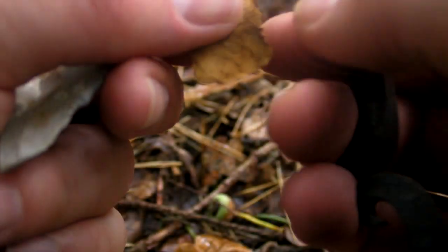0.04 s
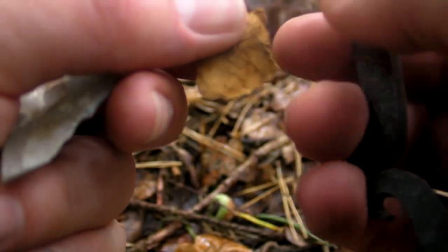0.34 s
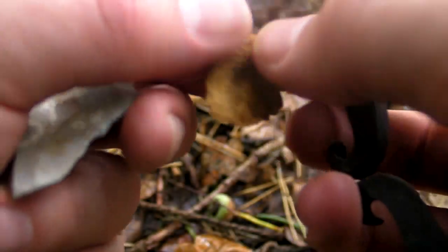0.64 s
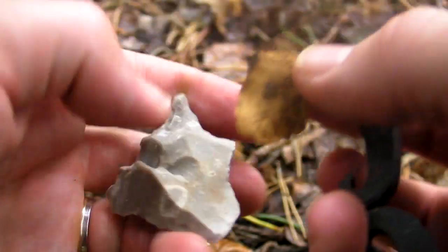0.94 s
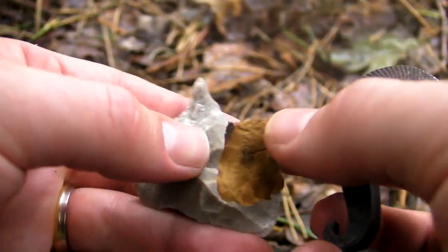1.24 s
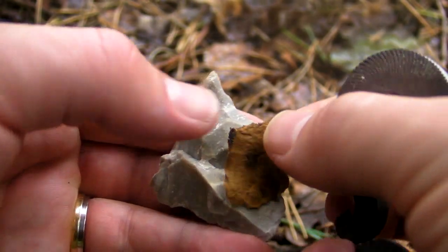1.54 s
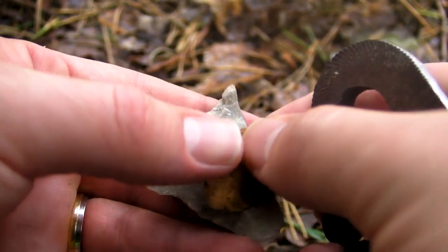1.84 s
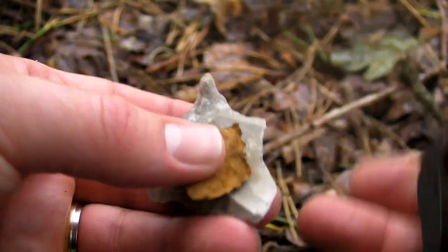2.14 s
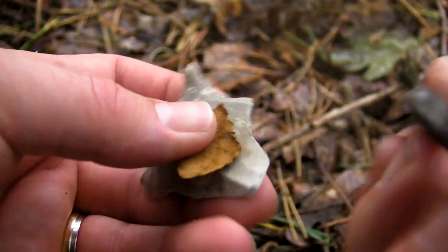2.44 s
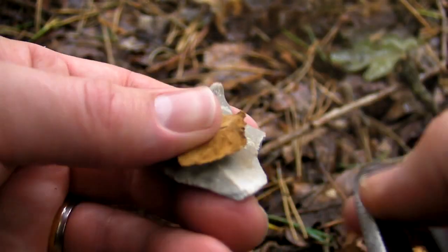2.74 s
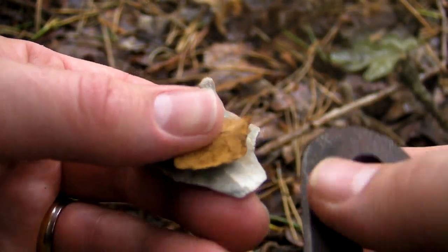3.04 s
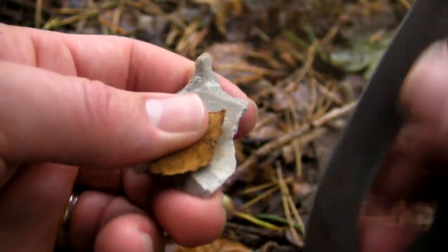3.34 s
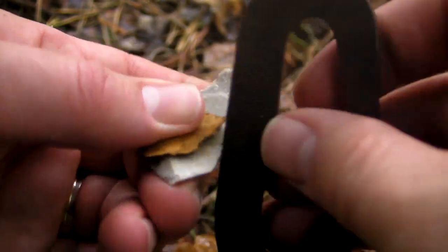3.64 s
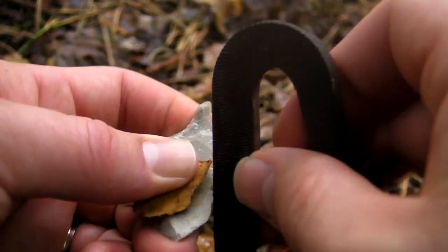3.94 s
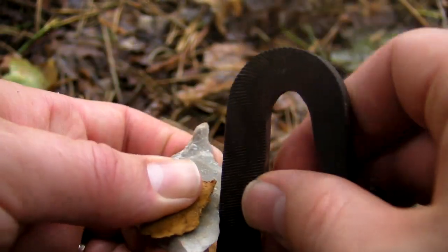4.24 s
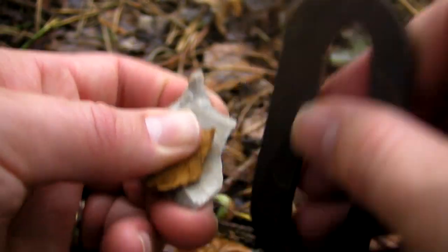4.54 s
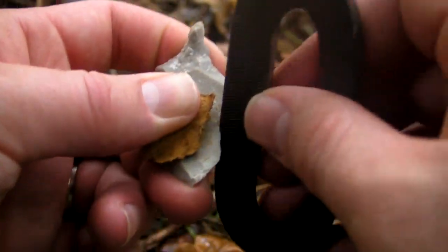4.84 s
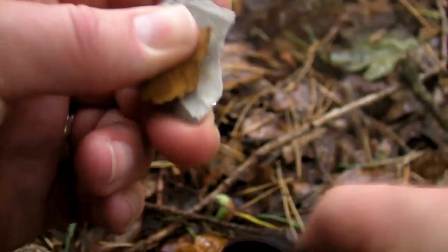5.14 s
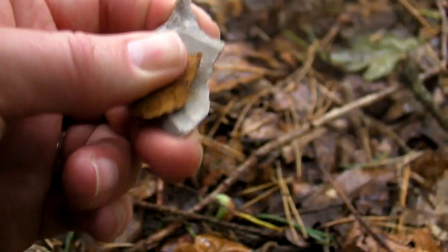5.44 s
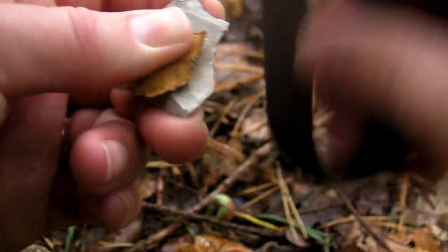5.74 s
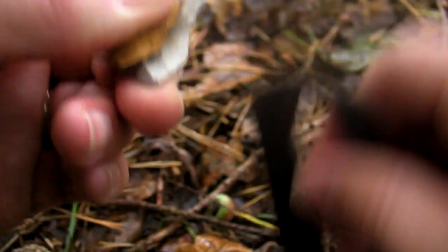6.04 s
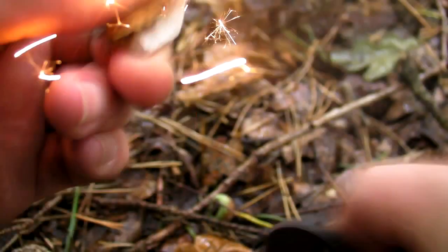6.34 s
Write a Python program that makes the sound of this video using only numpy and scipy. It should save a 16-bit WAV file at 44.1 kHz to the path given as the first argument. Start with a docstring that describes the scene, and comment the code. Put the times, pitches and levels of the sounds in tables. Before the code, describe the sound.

Light handling ticks and taps of steel on flint, then four sharp, hard strikes with a brief metallic ring, close up outdoors.

```python
"""A steel striker hits a flint four times, close by and hard enough to clip the microphones.
Each blow chips the stone, scrapes down its edge and sets the steel ringing briefly.
Before that, fingers settle dry tinder on the flint and the steel tries the edge with light
rubs and taps. On the quiet forest floor, a faint low hum comes and goes under the hiss of the air."""
import sys
import numpy as np
from scipy import signal
from scipy.fft import rfft, irfft, next_fast_len
from scipy.io import wavfile
from scipy.ndimage import uniform_filter1d, map_coordinates

SR = 44100
rng = np.random.default_rng(int(sys.argv[2]) if len(sys.argv) > 2 else 0)


def master_out(mix):
    """Clip the mix to full scale and print it as 16-bit PCM to the path in sys.argv[1]."""
    frames = np.transpose(np.atleast_2d(mix))
    ceiling = np.clip(frames, -1, 1)
    pcm = np.round(ceiling * 32767).astype(np.int16)
    wavfile.write(sys.argv[1], SR, pcm)


N = 291501
T = np.arange(2 ** 13) / SR  # time within one event, s


def amp(db):
    """Decibels to gain."""
    return 10 ** (np.asarray(db) / 20)


def unit(x):
    """Scale to rms 1."""
    return x / np.sqrt(np.mean(x ** 2) + 1e-20)


def along(points, hz):
    """Read (f/Hz, value) points on a log axis."""
    f, values = np.transpose(points)
    return np.interp(np.log(hz + 1), np.log(f + 1), values)


def curve(points):
    """Read (t/s, value) points at every sample."""
    return np.interp(np.arange(N) / SR, *np.transpose(points))


def wobble(rate_hz):
    """Smooth random curve, rate_hz knots a second."""
    knots = rng.standard_normal(int(N * rate_hz / SR) + 4)
    return map_coordinates(knots, [np.arange(N) * rate_hz / SR])


def add(track, at_s, sound):
    """Mix a sound into the track."""
    part = track[:, round(at_s * SR):][:, :sound.shape[-1]]
    part += sound[..., :part.shape[1]]


def band(x, lo_hz, hi_hz):
    """Causal band-pass; attacks stay sharp."""
    sos = signal.butter(2, [lo_hz, min(hi_hz, SR / 2 - 1)], "band", fs=SR, output="sos")
    return signal.sosfilt(sos, x)


def peak(hz, skirt_db):
    """Spectrum of one broad resonance."""
    return [(hz / 8, 2 * skirt_db), (hz / 2, skirt_db), (hz * 2 ** -0.25, -4), (hz, 0),
            (hz * 2 ** 0.059, -4), (hz * 2, skirt_db), (hz * 8, 2 * skirt_db)]


def noise(spectrum, correlation, size):
    """Stereo noise, rms 1, of given colour and left-right correlation."""
    hz = np.fft.rfftfreq(size, 1 / SR)
    angle = np.arccos(np.clip(along(correlation, hz), -1, 1)) / 2
    gain = amp(along(spectrum, hz)) / np.sqrt(1 + (hz / SR) ** 4)
    white = rfft(rng.standard_normal((2, size)))
    mid, side = irfft(white * gain * [np.cos(angle), np.sin(angle)], size)
    return unit(np.array([mid + side, mid - side]))


def ring(hz, db, t60_s):
    """Damped modes; level and pitch vary with each blow."""
    strength, detune = rng.standard_normal((2, len(hz)))
    t = T[:, None]
    phase = 2 * np.pi * hz * (1 + 0.005 * detune) * t
    fade = amp(db + 1.5 * strength - 60 * t / t60_s)
    return np.sum(fade * np.sin(phase), 1)


# Close sounds: f/Hz, left-right correlation
NEAR_CORRELATION = [(200, 0.52), (2500, 0.84), (6000, 0.64), (9000, 0.45), (15000, .1)]
def burst(spectrum, t60_s):
    """Impact noise decaying from about level 1."""
    fade = amp(-60 * T / t60_s)
    return unit(noise(spectrum, NEAR_CORRELATION, len(T)) * fade) * np.sqrt(np.mean(fade ** 2))


def friction(spectrum, rough_db, slip_samples=40):
    """Surfaces catch and slip at random."""
    catches = unit(uniform_filter1d(rng.standard_normal(len(T)), size=slip_samples))
    return unit(noise(spectrum, NEAR_CORRELATION, len(T)) * amp(rough_db * catches))


def stroke(length_s, spectrum, rough_db):
    """Grainy noise that swells and fades once."""
    swell = np.sqrt(np.abs(np.sin(np.pi * np.minimum(T / length_s, 1))))
    return swell * friction(spectrum, rough_db, slip_samples=90)


# Low air noise and hiss spectra: f/Hz, level/dB
LOW_AIR_SPECTRUM = [(12, -48), (20, -15), (38, -28), (71, -1.5), (140, -4.5), (171, -5), (241, -12.5),
                    (351, -4.5), (456, 0), (503, -5.5), (546, -5), (622, -8.5), (863, -9.5), (1000, -10),
                    (1300, -20), (2200, -120)]
HISS_SPECTRUM = [(470, -11.5), (800, -8), (862, -6), (1180, -5.5), (1420, -5.5), (1920, -5), (2240, -3.5),
                 (4030, -4.5), (4460, -5), (7450, -6), (8130, -8.5), (13600, -11), (16000, -18)]
# Open air: f/Hz, left-right correlation
AIR_CORRELATION = [(60, 0.72), (130, 0.79), (300, 0.22), (640, 0.5), (1400, 0.54), (3100, 0.4),
                   (6000, 0.085), (15000, 0.16)]
# Base level of the air: t/s, level/dB
AIR_LEVEL = [(0.0, -51.5), (2.74, -51), (3.31, -52), (3.87, -48.5), (4.29, -51), (5.52, -50), (6.61, -50)]
def air():
    """Low air noise under a nearly steady hiss."""
    base_db, size = curve(AIR_LEVEL), next_fast_len(N)
    low = amp(base_db - 4.5 + 0.37 * wobble(7)) * noise(LOW_AIR_SPECTRUM, AIR_CORRELATION, size)[:, :N]
    hiss = amp(base_db + 1.26 + 0.1 * wobble(5.6)) * noise(HISS_SPECTRUM, AIR_CORRELATION, size)[:, :N]
    return low + hiss


def tinder_crackle(count, level_db, spread_db):
    """Dry tinder crackles faintly at random moments."""
    out = np.zeros((2, N))
    for when, size, pitch in rng.random((count, 3)):
        crackle = burst(peak(700 * 10 ** pitch, skirt_db=-6.5), t60_s=0.014)
        add(out, when * N / SR, amp(level_db + spread_db * size ** 3) * crackle)
    return out


# Soft swells of noise: t/s, length/s, level/dB, f/Hz
SOFT_RUSTLES = [(0.223, .05, -44, 7500), (0.637, 0.047, -46.5, 5970), (1.739, 0.062, -47.5, 9250),
                (1.977, 0.039, -45.5, 6540), (2.468, 0.14, -50.5, 4500), (4.08, 0.2, -52, 645),
                (5.202, .18, -51.5, 5400)]
def rustles():
    """Faint rustles and rubs, and a high shimmer lingering after the first strike."""
    out = np.zeros((2, N))
    for at_s, length_s, db, hz in SOFT_RUSTLES:
        add(out, at_s, amp(db) * stroke(length_s, peak(hz, skirt_db=-7.5), rough_db=1.0))
    return out


# Contacts of fingers, tinder and flint: t/s, level/dB, f/Hz, relative knock/dB
HANDLING_TICKS = [(0.524, -32, 11000, -10), (0.865, -32.5, 5890, -27), (0.939, -27, 6100, -23),
                  (1.18, -39, 756, -7), (1.293, -30, 5000, -27), (1.584, -30.5, 3770, -14),
                  (1.884, -32.5, 2180, -25), (1.988, -32, 2560, -27), (2.364, -31, 907, -21),
                  (2.401, -29.5, 6060, -12), (3.54, -31, 4450, -49), (5.706, -29, 2940, -20.5),
                  (6.173, -29, 3580, -28), (6.402, -27, 2510, -27)]
# Knock in the hand: f/Hz, level/dB
KNOCK_SPECTRUM = [(80, -5), (250, -8), (550, 6), (1200, 2), (2200, -18), (8000, -30)]
def handling():
    """Each small contact gives a pitched tick and a dull knock."""
    out = np.zeros((2, N))
    for at_s, db, hz, knock_db in HANDLING_TICKS:
        tick = amp(-5.5) * burst(peak(hz, skirt_db=-9.5), t60_s=0.021)
        knock = amp(knock_db + 5.5) * burst(KNOCK_SPECTRUM, t60_s=0.024)
        add(out, at_s + 0.001, amp(db) * (tick + knock))
    return out


# Swells of the hum: t/s, level/dB
HUM_LEVEL = [(0, -97), (2.3, -70.5), (2.75, -66), (3.22, -52.5), (3.58, -59), (3.8, -73), (4.0, -65),
             (4.3, -60.5), (4.45, -76), (4.8, -54.5), (5.15, -71), (5.8, -64), (6.25, -56.5), (6.55, -59)]
def hum():
    """A faint low tone comes and goes, wavering slightly in pitch."""
    hz = 138 + 0.97 * wobble(7.6)
    return amp(curve(HUM_LEVEL) + 1) * unit(np.sin(2 * np.pi * np.cumsum(hz) / SR))


# Steel sliding on flint: f/Hz, level/dB
SLIDE_SPECTRUM = [(200, -11), (700, -20.5), (1200, -7), (2000, -1.5), (3000, -4), (3900, -16), (5300, -11),
                  (5900, -6.5), (6600, -19), (9000, -24), (16000, -20)]
# Light touches: t/s, flint/dB, flint pitch ratio, ring/dB, grit/dB, rebound gap/s, slide/s, slide/dB
LIGHT_TAPS = [(2.404, -43.5, 1.05, -48, -49, 0.0045, 0.022, -52),
              (3.6098, -4.5, 1.11, -13, -17.5, .0024, 0.0098, -32),
              (3.648, -21, 0.72, -48, -47, 0.0057, .004, -32),
              (3.6678, -19.5, 0.87, -33, -41, 0.0036, .004, -35),
              (3.7069, -27.5, 0.68, -46, -49, .003, 0.032, -36.5),
              (3.786, -26, .86, -34, -45, .0026, .003, -33.5),
              (3.9492, -13.5, 1, -10, -14.5, .0012, .028, -28.5),
              (4.4602, -25, 1.02, -34, -21.5, 0.0056, .01, -36.5),
              (4.7779, -7.5, 1.01, -19, -20.5, 0.00134, 0.023, -34),
              (4.8875, -18, 0.78, -44, -20.5, 0.0043, 0.039, -35)]
def slides(rise_db):
    """Steel drags along the flint, ever more firmly, into each tap."""
    out = np.zeros((2, N))
    for at_s, *_, length_s, db in LIGHT_TAPS:
        closing_db = rise_db * (np.minimum(T / length_s, 1) - 1)
        rub = stroke(length_s + 0.0067, SLIDE_SPECTRUM, rough_db=3.0)
        add(out, at_s - length_s, amp(db + closing_db) * rub)
    return out


def taps(contacts, light_db):
    """Each tap chatters; the firmer it is, the faster its rebounds fade."""
    out = np.zeros((2, N))
    for at_s, flint_db, pitch, ring_db, grit_db, gap_s, *_ in LIGHT_TAPS:
        loss_db = 6 + 0.39 * (flint_db - light_db)
        for k in range(contacts):
            touch = contact(flint_db, pitch, ring_db - k * loss_db / 2, grit_db, ring_t60_s=0.039)
            add(out, at_s + k * gap_s, amp(-k * loss_db) * touch)
    return out


# Hand-held flint: f/Hz, level/dB, t60/s
FLINT_MODES = [(846, -37, 0.002), (1440, -49, 0.021), (2260, -56, 0.0063), (2590, -4.5, 0.0076),
               (3040, -8, 0.0076), (3520, -14, 0.013), (4070, -27.5, 0.01)]
def flint_click(pitch):
    """Dry click; the pitch ratio stands for contact point and grip."""
    hz, db, t60_s = np.transpose(FLINT_MODES)
    return band(ring(hz * pitch, db, t60_s), lo_hz=543, hi_hz=6200)


# Steel striker: f/Hz, level/dB
STEEL_MODES = [(5880, -1), (5980, -12), (7350, -22), (9550, -29.5), (10580, -40), (12400, -37),
               (13370, -24.5), (15480, -27)]
def steel_ring(t60_s, attack_s):
    """The striker rings; the grip damps all modes alike."""
    hz, db = np.transpose(STEEL_MODES)
    return ring(hz, db, t60_s) * (1 - np.exp(-T / attack_s))


# Grit under the steel: f/Hz, level/dB
GRIT_SPECTRUM = [(150, -27), (450, 4), (1300, -38), (2500, 11), (3400, -9), (5000, 4.5), (6800, 3.5),
                 (8500, -12), (16000, 5)]
def contact(flint_db, pitch, ring_db, grit_db, ring_t60_s):
    """Steel meets flint: click, short ring and a little grit."""
    steel = amp(ring_db) * steel_ring(ring_t60_s, attack_s=0.00085)
    grit = amp(grit_db) * band(burst(GRIT_SPECTRUM, t60_s=0.018), lo_hz=280, hi_hz=9000)
    return amp(flint_db + 2) * flint_click(pitch) + steel + grit


# Flint chipping and scrape down the edge: f/Hz, level/dB
CHIP_SPECTRUM = [(120, -31), (200, -37), (465, -14), (1450, -11.5), (2560, -3.5), (3250, -6.5), (3690, 1),
                 (5040, -2.5), (5940, -2.5), (7410, 0.5), (8120, -5.5), (10900, -9.5), (11700, -9),
                 (13600, -2), (16000, -25)]
SCRAPE_SPECTRUM = [(300, -39), (1500, -36), (2200, -4), (3600, -0.5), (5000, 0), (6800, 4), (8500, -9),
                   (10800, -3.5), (11900, -34), (13400, -3), (16000, -28)]
# Hard blows: t/s, crack/dB, crack low cut/Hz, scrape/dB, scrape/s, thud/dB, ring/dB,
# crunch/Hz, crunch/dB, bite delay/s, bite/dB
HARD_STRIKES = [(5.1267, -4.5, 303, -16, 0.015, -16, -1.5, 2770, -29, .0064, -11),
                (5.5574, -3.5, 600, -10, 0.007, -22, -2.5, 2700, -9.5, .0095, -20),
                (5.9455, -4, 1620, -9.5, 0.01, -31.5, -3.5, 3210, -13, .0048, -20),
                (6.3202, 3.5, 1010, -14, 0.014, -19.5, 0, 3830, -20, .0045, -14.5)]
def strikes():
    """The steel chips the edge, rings, jolts the hand and crunches on down the flint."""
    out = np.zeros((2, N))
    thud_spectrum = [(25, -23), (85, 6.5), (240, -30), (420, 3.5), (1000, -7.5), (3000, -25), (9000, -50)]
    for (at_s, crack_db, cut_hz, scrape_db, scrape_s, thud_db, ring_db,
         crunch_hz, crunch_db, *_) in HARD_STRIKES:
        # glancing blows have less body: higher low cut
        crack = amp(crack_db) * band(burst(CHIP_SPECTRUM, t60_s=0.015), lo_hz=cut_hz, hi_hz=18600)
        scrape = amp(scrape_db) * friction(SCRAPE_SPECTRUM, rough_db=0) * np.exp(-(T / scrape_s) ** 2)
        # each contact point has its own resonance
        crunch = amp(crunch_db) * friction(peak(crunch_hz, skirt_db=-34), rough_db=1.5)
        crunch *= amp(-60 * T / (5 * scrape_s))
        thud = amp(thud_db) * burst(thud_spectrum, t60_s=0.029)
        steel = amp(ring_db) * steel_ring(t60_s=0.015, attack_s=0.00039)
        add(out, at_s, crack + scrape + crunch + thud + steel)
    return out


def bites(click_db):
    """The flint clicks under each strike; a moment later the steel bites again."""
    out = np.zeros((2, N))
    main_hz = max(FLINT_MODES, key=lambda mode: mode[1])[0]
    for at_s, *_, crunch_hz, _, delay_s, db in HARD_STRIKES:
        pitch = crunch_hz / main_hz
        add(out, at_s, amp(click_db) * flint_click(pitch))
        bite = contact(db - 6, pitch, ring_db=db - 0.5, grit_db=db - 5, ring_t60_s=0.017)
        add(out, at_s + delay_s, bite)
    return out


def swishes(level_db, width_s):
    """A soft hiss swells and fades around each strike."""
    out = np.zeros((2, N))
    t = T - T.mean()
    swell = np.exp(-(t / width_s) ** 2 - (t / 0.03) ** 8)
    for at_s, *_ in HARD_STRIKES:
        add(out, at_s - T.mean(), amp(level_db) * swell * noise(CHIP_SPECTRUM, NEAR_CORRELATION, len(T)))
    return out


# Forest reverberation: f/Hz, t60/s
FOREST_DECAY = [(200, 0.075), (2500, 0.12), (12000, 0.093)]
def forest(x):
    """Ground and trunks scatter a short tail."""
    hz, t, bins = signal.stft(rng.standard_normal((2, SR // 2)), SR, nperseg=256)
    fade = amp(-60 * t / along(FOREST_DECAY, hz)[:, None])
    _, tail = signal.istft(bins * fade, SR, nperseg=256)
    return signal.fftconvolve(x, tail / np.linalg.norm(tail[0]), axes=1)[:, :N]


def mic_ports(x, one_radian_hz):
    """Treble reaches the two microphone ports out of step, right first."""
    size = next_fast_len(N + 4096)
    lag_rad = (np.fft.rfftfreq(size, 1 / SR) / one_radian_hz) ** 1.65
    return irfft(rfft(x, size) * np.exp(0.5j * np.array([-lag_rad, lag_rad])), size)[:, :N]


def scene():
    """Steel, flint and fingers close to the microphones, in open air."""
    blows = strikes() + bites(click_db=-7.5) + swishes(level_db=-25, width_s=0.022)
    touches = taps(contacts=3, light_db=-20) + handling() + slides(rise_db=4)
    faint = rustles() + tinder_crackle(count=150, level_db=-47, spread_db=9.5)
    balance = amp([[-0.3], [0.3]])
    near = band((blows + touches + faint) * balance, lo_hz=55, hi_hz=22700)
    near = signal.lfilter(*signal.iirnotch(248, Q=2, fs=SR), near)  # hollow low mids
    return mic_ports(near + amp(-18.5) * forest(near) + air() + hum(), one_radian_hz=7650)


def record(dry):
    """Soft clipping of the loudest blows, then the band limit."""
    ceiling, top_hz = 0.88, 15900
    clipped = dry / (1 + np.abs(dry / ceiling) ** 8) ** (1 / 8)
    return signal.fftconvolve(clipped, signal.firwin(161, top_hz, fs=SR)[None], "same", axes=1)


dry = scene()
out = record(dry)
master_out(out)
```